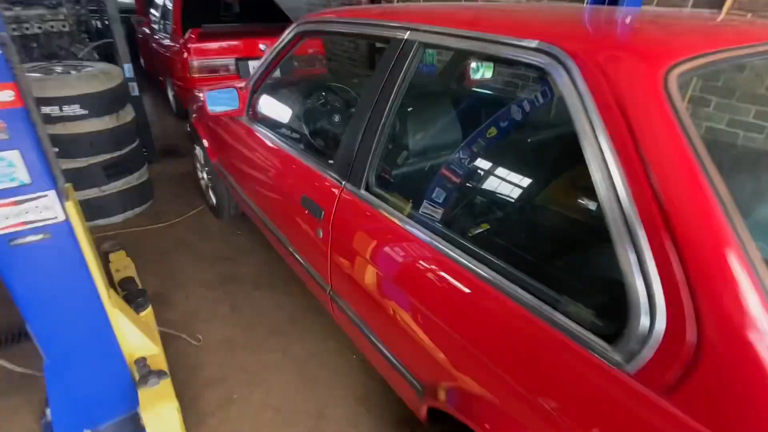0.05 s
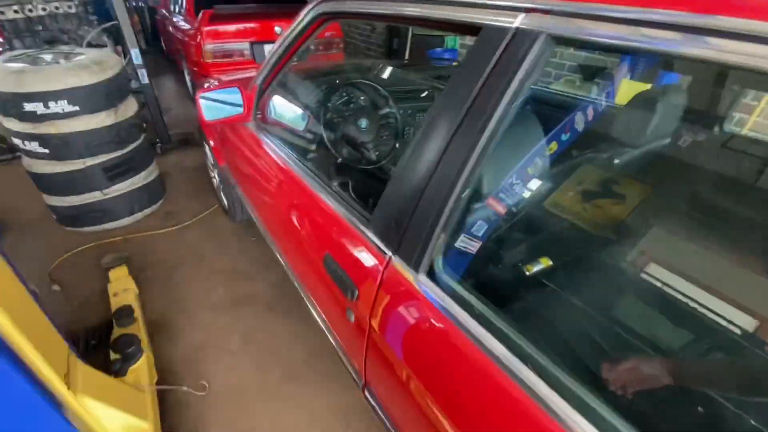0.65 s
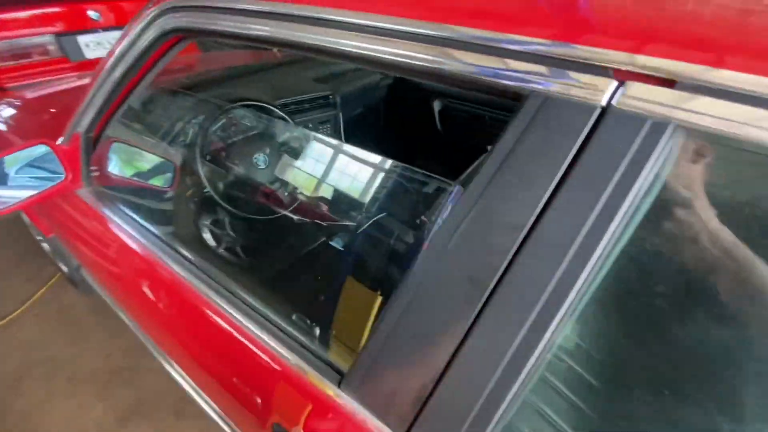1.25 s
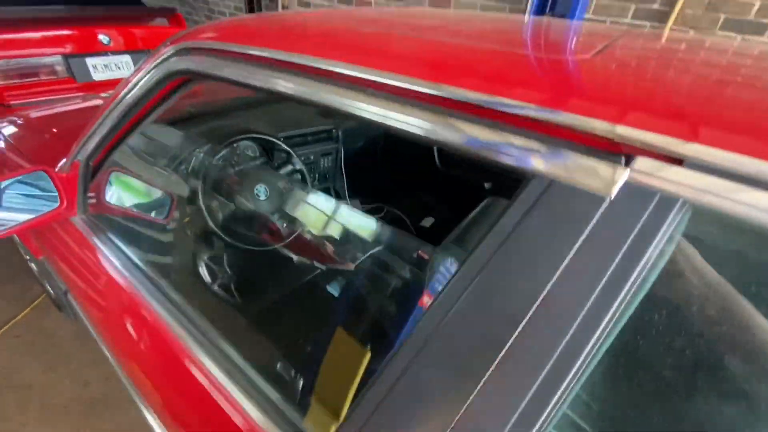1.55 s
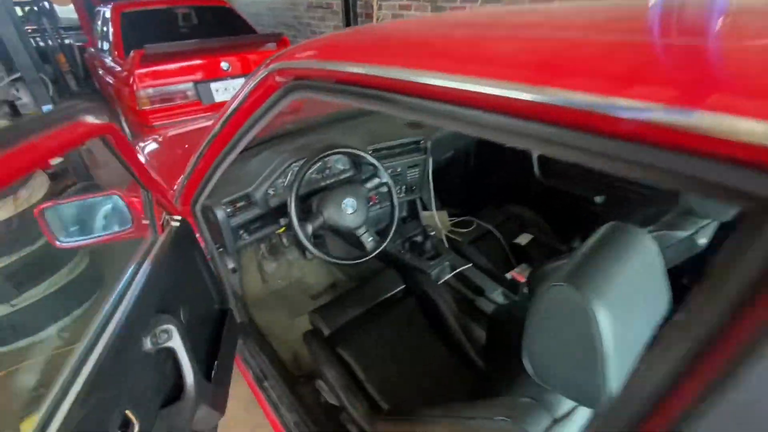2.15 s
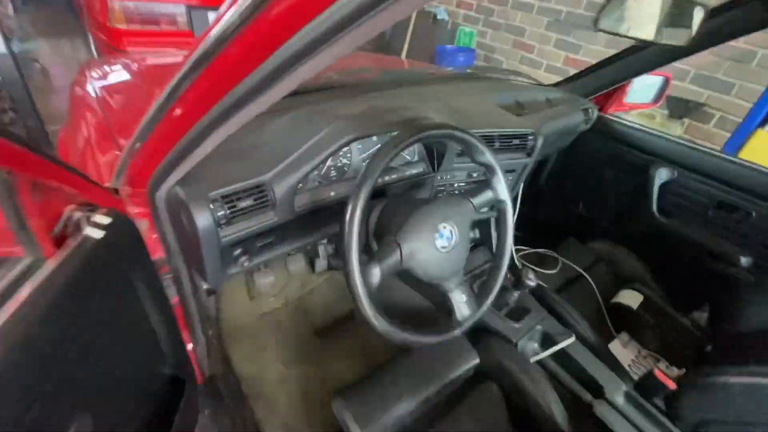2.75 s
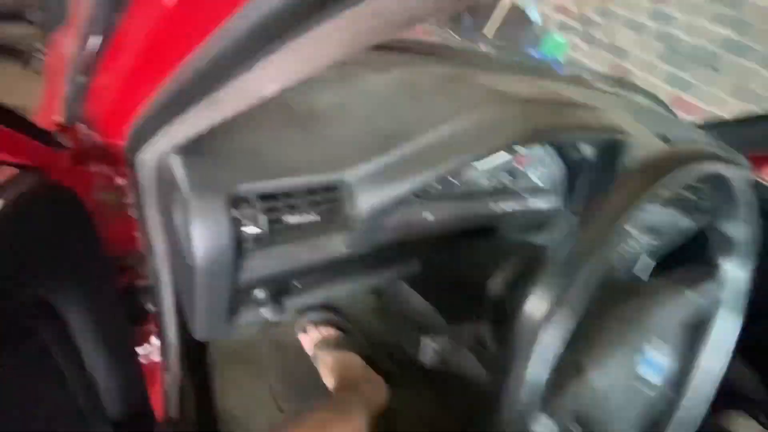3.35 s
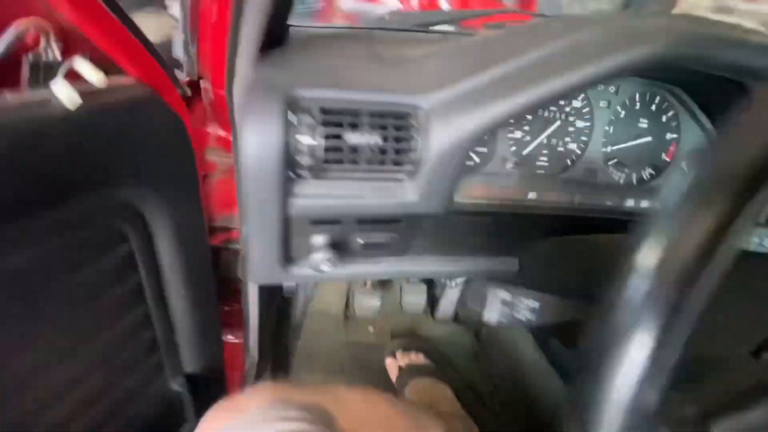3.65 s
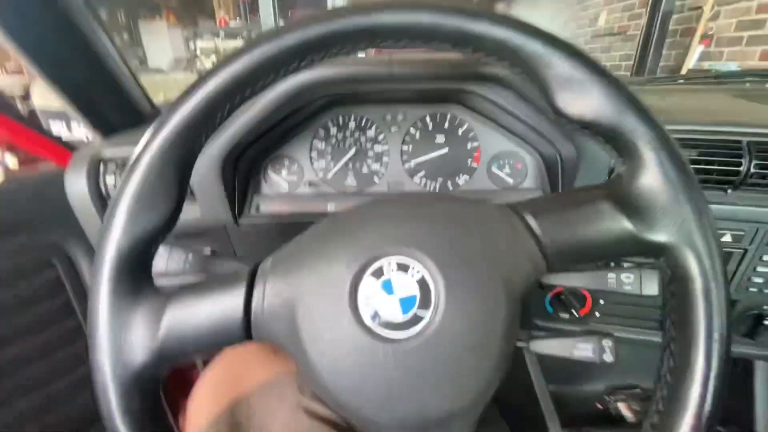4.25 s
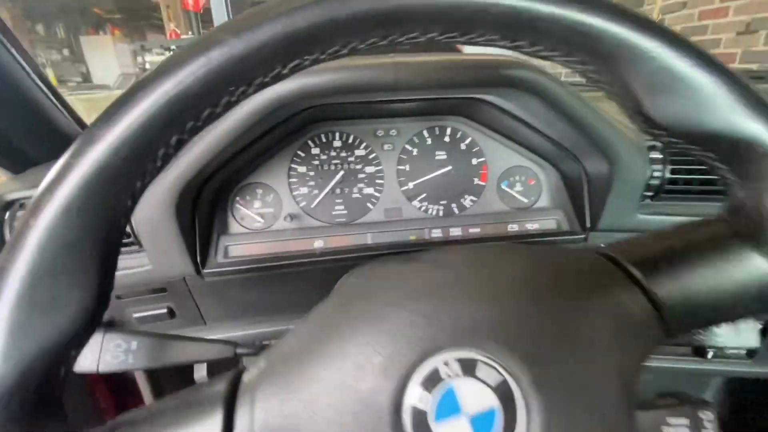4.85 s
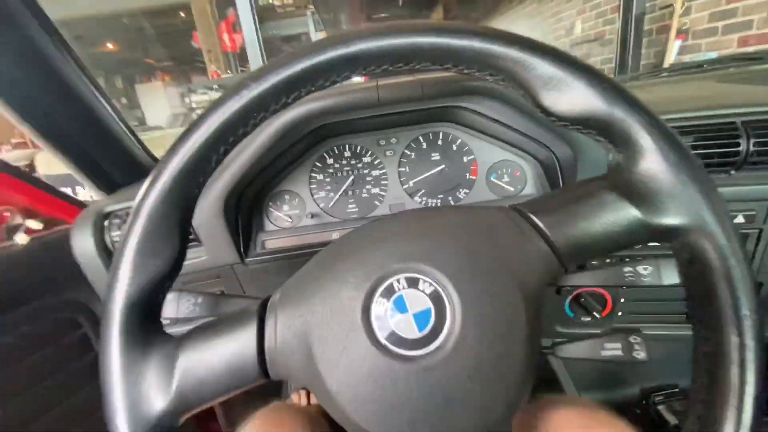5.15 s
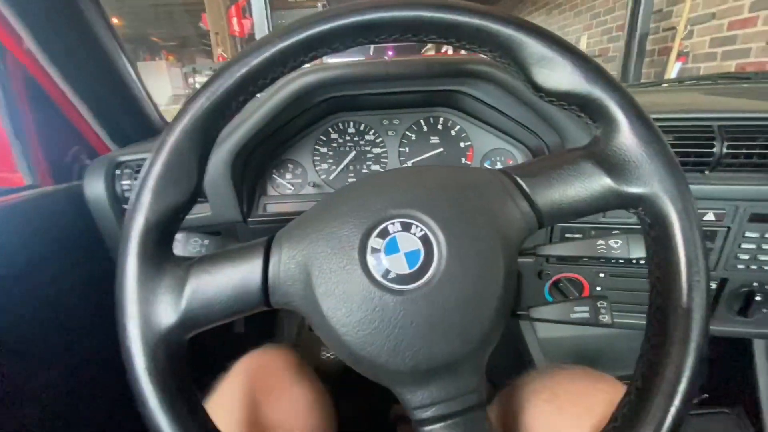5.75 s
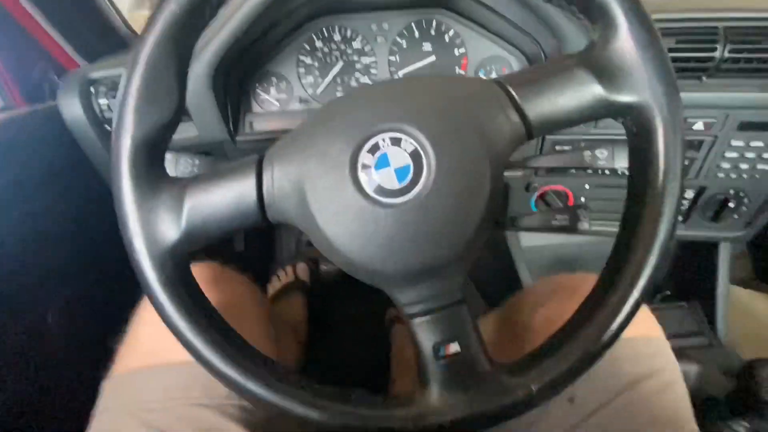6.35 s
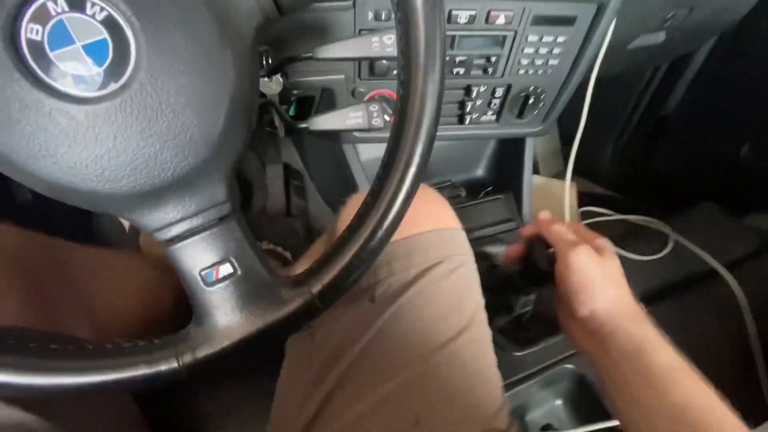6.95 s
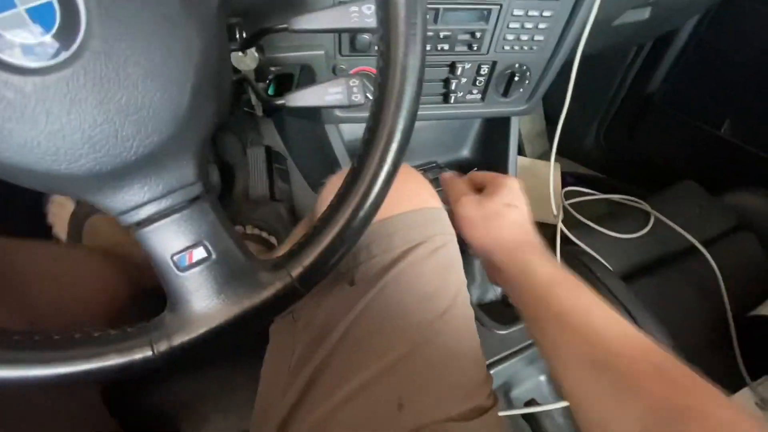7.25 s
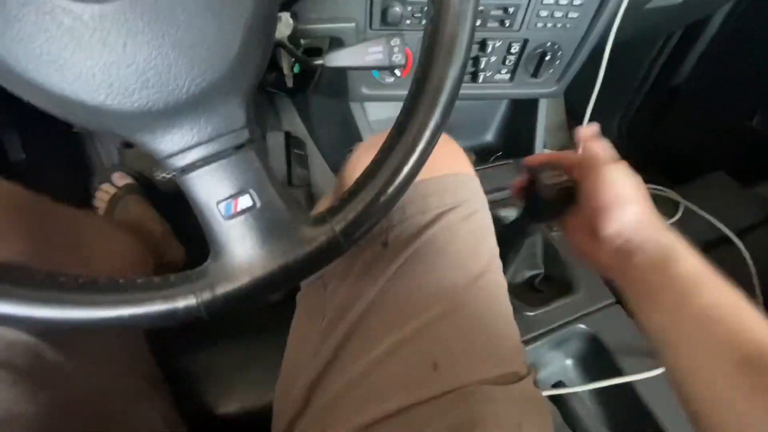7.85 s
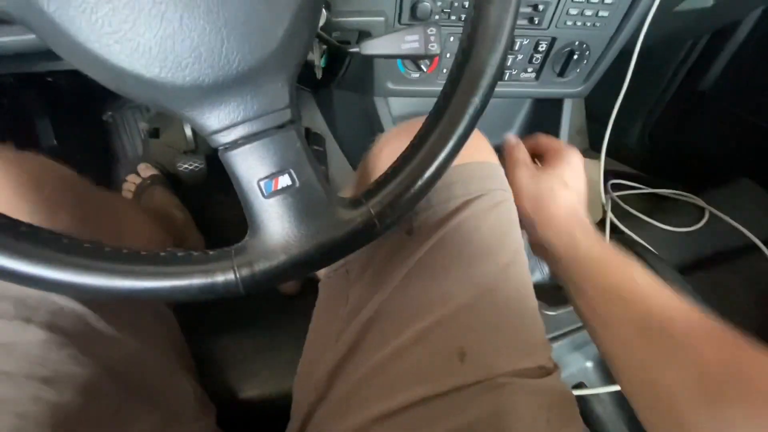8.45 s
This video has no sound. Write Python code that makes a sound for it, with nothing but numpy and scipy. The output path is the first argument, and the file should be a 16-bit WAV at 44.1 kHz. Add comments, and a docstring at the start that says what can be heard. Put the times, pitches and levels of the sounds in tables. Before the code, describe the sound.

Latch clacks, rustling and bumps as someone climbs into a car, a booming door slam, then dull gear lever knocks with no engine running.

```python
"""In a workshop, someone unlatches a car door, swings it open, slides onto the seat and slams it shut.
Then, in the closed cabin with the engine off, the gear lever is knocked through its gates.
Each impact excites dense panel vibration; heavy ones also ring the normal modes of door skin, latch,
frame, linkage, floor or cabin air. Stick-slip friction makes clothes rustle and leather and trim creak.
Under it all lies the hum of the workshop, muffled once the door is shut."""
import sys
import numpy as np
from scipy import signal
from scipy.fft import rfft, irfft, next_fast_len
from scipy.io import wavfile

SR = 44100
rng = np.random.default_rng(int(sys.argv[2]) if len(sys.argv) > 2 else 0)


def inscribe(sig):
    """Save sig as 16-bit PCM at rate SR to the path in sys.argv[1].

    A 1-D sig is mono; a 2-D sig holds one channel per row.
    Samples are clipped to [-1, 1] before scaling.
    """
    pcm = np.round(np.clip(np.atleast_2d(sig).T, -1, 1) * 32767)
    wavfile.write(sys.argv[1], SR, pcm.astype(np.int16))


N = 379701
TIME = np.arange(N) / SR
RING_TIME = np.arange(SR * 2 // 5) / SR
BAND_HZ = 32 * 2 ** (np.arange(19) / 2)
LN_1000 = np.log(1000)  # a decay of 60 dB; t60 is the time it takes
BOOM_S = 5.6135  # the door seals the cabin

# Levels in the tables are relative: gains and filters follow. Pan is left minus right.
# The sound field at two points. Each row: frequency in Hz, left-right correlation or pan in dB.
CORRELATION = [(40, 0.83), (200, 0.64), (500, 0.16), (1000, -0.1), (2200, -0.07), (4500, -0.14),
               (9000, 0.48)]
BAND_PAN = [(50, -3.5), (200, 0), (500, -2), (1000, 4.5), (2000, -1.5), (4200, 5.5), (9000, 0.5)]
# Spectra of the sources. Each row: frequency in Hz, band level in dB.
WORKSHOP_SPECTRUM = [(30, -92.5), (46, -75), (70, -62), (160, -67.5), (400, -67.5), (800, -71), (2000, -69),
                     (4000, -73.5), (7000, -87.5), (11000, -83.5), (16000, -112)]
HARDWARE_SPECTRUM = [(45, -20.5), (110, -6), (220, -1), (480, 0), (800, -3.5), (1400, -6), (3200, -8),
                     (5000, 10), (8000, 0), (11000, 23), (13500, -4.5), (16000, -23)]
CLOTH_SPECTRUM = [(30, -9), (60, -1.5), (130, -5.5), (250, -13.5), (600, -5), (850, -7), (1800, -5),
                  (3300, -14.5), (5000, -9), (8000, -15), (11000, -0.5), (13500, -9.5), (16000, -25)]
TRIM_SPECTRUM = [(45, -17), (110, 7), (220, 1.5), (450, -2.5), (800, -5), (1400, -6.5), (3000, -13.5),
                 (5000, 2), (8000, -16.5), (11000, 6.5), (13500, -20), (16000, -4.5)]
SHELL_SPECTRUM = [(45, -3.5), (110, -11), (220, -6), (500, -1.5), (780, -16.5), (1050, -5), (1800, -15),
                  (3200, -7.5), (5000, 2), (8000, -10), (11000, 2.5), (13500, -13), (16000, -23)]
LINKAGE_SPECTRUM = [(45, 13), (110, -9.5), (250, -7.5), (380, -3.5), (750, -7.5), (1600, -3), (3000, -19.5),
                    (5000, -5), (8000, -12.5), (11000, 0), (13500, -17), (16000, -11)]
# Transmission through the closed door. Each row: frequency in Hz, gain in dB.
DOOR_TRANSMISSION = [(60, -5), (400, -16.5), (2000, -13), (5000, -26)]

# Light impacts. Each row: start in seconds, clack level in dB, body level in dB, pan in dB.
OUTSIDE_TICKS = [(0.0568, -41, -42.5, -1), (0.3482, -30, -45.5, 5), (0.3658, -34, -52, -4),
                 (0.641, -42, -42.5, 2.5), (0.8759, -46, -73.5, 2.5), (0.9535, -45.5, -51.5, 2),
                 (0.97, -40, -45.5, 1), (1.082, -48, -68.5, -1.5), (1.118, -45, -69.5, -0.5),
                 (1.134, -37.5, -65.5, 0.5), (1.1548, -40.5, -74, -0.5), (1.1707, -35, -72, 1.5),
                 (2.368, -42.5, -52, -3), (2.5975, -47, -61, 10), (2.6513, -44, -57, 5)]  # ticks, scuffs and steps
LIMB_BUMPS = [(2.729, -55, -42, -1), (3.2142, -36.5, -30, -2), (3.3767, -48, -34.5, 1.5),
              (3.6295, -33, -32.5, 3.5), (4.0102, -44, -37.5, -4), (4.0427, -39.5, -33.5, -1),
              (4.1864, -27.5, -27, 0.5), (4.2042, -39, -28.5, -1.5), (4.283, -37, -37, 2),
              (4.4516, -47, -26, 0), (4.471, -35.5, -36.5, 2), (4.6861, -38.5, -28, -1),
              (4.925, -38.5, -51, 1.5), (5.2364, -47, -42, 0), (5.468, -55, -38, 0.5),
              (6.3856, -41, -42.5, 3), (6.4547, -47, -50.5, 2)]
LEVER_KNOCKS = [(6.7594, -50, -60, 4.1), (6.92, -67.5, -51, 1.9), (7.198, -51.5, -45.5, 1.4),
                (7.21, -47, -43, 2.2), (7.3472, -47, -38.5, 2.2), (7.405, -51.5, -56, 8),
                (7.635, -51.5, -49, 0.88), (7.8353, -50.5, -46, 3.3), (7.8844, -56.5, -55, 6),
                (8.303, -43.5, -50, 4.1), (8.464, -52, -39.5, 2.8), (8.4945, -37, -32.5, 6)]  # play in the gear linkage
# Hard impacts. Each row: start in seconds, levels of clack, body and bright edge in dB, t60 in seconds.
LATCH_IMPACTS = [(1.318, -37.5, -39, -81, 0.15), (1.3442, -30, -44, -57.5, 0.058),
                 (1.4094, -15.5, -16, -31.5, 0.062), (1.5153, -24, -36.5, -53, 0.056),
                 (1.661, -46, -45.5, -67, 0.12), (1.7535, -30, -39.5, -45, 0.11),
                 (1.8175, -25.5, -22, -70, 0.15)]
SLAM_IMPACTS = [(5.5653, -11.5, -22, -28, 0.24), (5.579, -9, -5.5, -43, 0.15),
                (5.597, -41, -17, -31.5, 0.24), (5.617, -12, 0, -27.5, 0.044),
                (5.665, -22.5, -18, -42, 0.11), (5.713, -24.5, -26, -41, 0.092),
                (5.759, -29, -30, -60, 0.091), (5.832, -40, -35, -70, 0.16), (5.9, -38, -41, -82, 0.08)]  # first catch, second catch, seal, frame, then the loose window

# Rubs with their own resonances. Each row: middle in seconds, level in dB, half-length in seconds,
# frequency in Hz, bandwidth in Hz.
CREAKS = [(0.059, -48, .003, 620, 600), (0.644, -39, 0.0027, 950, 700), (1.397, -32, 0.0082, 620, 220),
          (1.5205, -32.5, 0.0022, 3360, 1400), (1.521, -38, 0.0032, 1640, 500),
          (1.533, -28.5, 0.006, 433, 140), (1.758, -34, 0.0032, 3570, 500), (1.759, -33, 0.004, 707, 250),
          (1.822, -30, .0015, 800, 600), (1.823, -30, 0.0026, 3160, 700), (2.369, -52, 0.0045, 2800, 1210),
          (2.429, -54, .012, 1300, 400), (2.56, -55, .004, 2010, 900), (2.616, -47.5, 0.0076, 1350, 250),
          (2.637, -49.5, .005, 2550, 916), (2.655, -43, 0.0022, 3330, 1100),
          (2.656, -45, 0.0031, 1350, 600), (2.958, -41, 0.013, 1330, 350), (2.975, -48, .003, 2600, 1500),
          (3.025, -44.5, 0.0055, 3800, 2180), (3.525, -48.5, 0.0051, 2200, 2180),
          (3.632, -36.5, 0.0019, 2150, 800), (3.65, -46, 0.0029, 2200, 1494),
          (3.819, -47, 0.019, 2740, 450), (3.866, -43, 0.013, 2100, 893), (4.016, -35, 0.0057, 1320, 800),
          (4.048, -43, 0.0023, 2300, 900), (4.286, -40.5, .0014, 1980, 1800),
          (4.359, -49, 0.041, 1150, 350), (4.529, -49, 0.0021, 1600, 900), (4.574, -46, .002, 1400, 700),
          (4.607, -42, .0025, 1310, 592), (4.641, -44, 0.0033, 1490, 900), (4.788, -42, .016, 1240, 400),
          (4.915, -46, 0.0026, 1700, 900), (5.024, -45.5, 0.0018, 2300, 1600),
          (5.24, -46.5, .0015, 2000, 1500), (5.474, -47, 0.0022, 2400, 1500),
          (6.448, -49.5, .012, 960, 297)]  # handle, door stay, soles, seat leather and trim
STRIKER_CRUNCHES = [(5.567, -15.5, .0016, 1200, 802), (5.569, -19.5, 0.00076, 3610, 3510),
                    (5.577, -20.5, 0.00092, 4200, 1500), (5.58, -18.5, .001, 1700, 695),
                    (5.5895, -19, 0.0014, 3500, 702), (5.576, -26, 0.0082, 1607, 712),
                    (5.5858, -12.5, 0.0027, 1150, 603), (5.591, -21, .003, 3200, 904),
                    (5.597, -21, 0.002, 3000, 2476), (5.605, -18, 0.0014, 1495, 1809),
                    (5.622, -14.5, 0.0036, 1080, 400), (5.627, -25, 0.0068, 2050, 249),
                    (5.634, -23, .0012, 2900, 1200), (5.673, -29.5, 0.0052, 1860, 352),
                    (5.715, -31, 0.0018, 2200, 1800), (5.76, -37, 0.0022, 2400, 3000)]  # the latch rides over the striker and the pane chatters
PIVOT_SQUEAKS = [(7.238, -50.5, .02, 1486, 45), (7.68, -60.5, 0.061, 1620, 80), (7.862, -63, .04, 1625, 80),
                 (8.04, -75, 0.084, 1504, 700), (8.286, -63.5, 0.021, 1494, 1096),
                 (6.765, -58.5, 0.0029, 5000, 1200), (8.305, -55, .0015, 5000, 908),
                 (8.306, -52, .002, 1430, 250), (8.468, -44, .004, 1460, 300),
                 (8.49, -37.5, .002, 1700, 1300), (8.496, -31, 0.0034, 1450, 500),
                 (8.497, -28.5, 0.0071, 540, 224), (8.505, -27.5, 0.0052, 1070, 450)]
# Rubs, one resonance to a table. Each row: middle in seconds, level in dB, half-length in seconds.
CLOTH_SWISHES = [(0.97, -57.5, 0.024), (1.16, -48.5, 0.069), (2.6, -55, 0.036), (2.98, -46, 0.076),
                 (3.79, -43, 0.056), (5.563, -37, 0.0064)]
SPRING_GROANS = [(1.325, -33, 0.005), (1.392, -31, .0035), (1.481, -31, 0.008), (1.58, -51, 0.01),
                 (1.71, -42, 0.008)]
SEAT_CREAKS = [(4.37, -54, 0.048), (4.66, -47, 0.034), (4.84, -43, 0.082), (4.965, -42, 0.0053),
               (5.06, -44, 0.018), (5.1, -41, 0.01), (5.205, -44, 0.013), (5.243, -35, 0.004),
               (5.474, -40, 0.003), (6.03, -49, 0.017)]
SEAT_SQUEAKS = [(4.87, -45.5, 0.071)]
LEVER_BOOT_RUBS = [(6.62, -56.5, 0.077), (7.01, -64.5, 0.038), (7.13, -57.5, 0.033), (7.28, -59.5, 0.024),
                   (7.415, -60, .012), (7.465, -59, .01), (8.53, -43, 0.044)]
# The person reaches, climbs in, settles and works the lever. Each row: time of full strength, swell,
# hold and fade in seconds, levels of cloth, rumble and hiss in dB.
MOVEMENTS = [(1.31, 0.3, 0.18, 0.068, -54, -55.5, -67), (2.38, 0.028, 0.064, 0.19, -54, -59.5, -65),
             (2.76, 0.073, 0.015, 0.016, -61.5, -56.5, -80), (2.968, 0.26, 0.031, 0.12, -50.5, -63, -55),
             (3.207, 0.027, 0.49, 0.28, -57.5, -52.5, -63.5), (3.67, 0.088, 0.22, 0.35, -43.5, -42.5, -57),
             (4.46, 0.1, 0.27, 0.09, -50, -45, -66), (4.793, 0.11, 0.15, 0.35, -48, -48, -63),
             (5.216, 0.16, 0.13, 0.04, -57.5, -59.5, -66.5), (5.771, 0.079, 0.023, 0.13, -48, -27.5, -54.5),
             (6.042, 0.24, 0.34, 0.22, -57.5, -47.5, -66), (6.787, 0.084, 0.018, 0.062, -59, -55, -75),
             (7.145, 0.17, 0.65, 0.11, -66, -52, -83.5), (7.95, 0.026, 0.033, 0.15, -76.5, -70, -85.5),
             (8.54, 0.11, 0.026, 0.11, -49.5, -33.5, -72)]

# Soft blows through the car's body. Each row: start in seconds, level in dB, pitch in Hz,
# ring of the cabin air in dB relative to the blow.
FLOOR_THUMPS = [(1.388, -28, 150, -12), (1.419, -28, 56.6, -21), (1.438, -34, 137, -7),
                (1.457, -31, 205, -10), (1.888, -22, 196, -11.5), (2.757, -42.5, 73, -8),
                (3.232, -28.5, 125, -1), (3.326, -29, 124, -5), (3.648, -24.5, 127, -1.5),
                (4.22, -32, 62, 9), (4.456, -27, 151, 1), (4.688, -22.5, 123, -1.5),
                (5.797, -15.5, 41.5, -6), (5.95, -31, 45, -4), (7.03, -42.5, 76, -12),
                (7.236, -40, 87, -14)]
# Blows that excite modes. Each row: start in seconds, level in dB, low-pass corner in Hz.
LATCH_BLOWS = [(1.411, -38.5, 9000), (1.519, -38, 4040)]  # the latch springs open, then snaps back
SKIN_BLOWS = [(1.416, -24, 900), (1.519, -45, 900), (1.836, -23, 302)]
FRAME_BLOWS = [(5.5665, -24.5, 5930), (5.581, -14, 4006), (5.599, -17, 601), (5.617, -24, 2000),
               (5.668, -39, 3020)]  # the door lands in its frame and rattles
# Normal modes. Each row: frequency in Hz, level in dB, t60 in seconds.
LATCH_MODES = [(1180, -11, .25), (1284, -4.5, 0.42), (1520, -5.5, .14), (2100, -11, 0.25), (2414, -7.5, .2),
               (3600, -7.5, .16), (4430, -9.5, .16), (4795, -15.5, .42)]
SKIN_MODES = [(184, -3.5, 0.3), (202, -13, 0.68), (252.3, -3.5, 0.3), (328, -11.5, 0.2), (373, -3, .14),
              (421, -5.5, 0.22), (460, -1.5, 0.14), (524, -1.5, 0.27), (539, -4.5, 0.18), (602, -2.5, 0.16),
              (660, -9.5, .1)]
FRAME_MODES = [(328.5, -5, 0.21), (495, -9.5, 0.2), (535, -6.5, .26), (624.5, -2, .2), (691, -12, 0.089),
               (758, -11, 0.069), (943, -6.5, 0.16), (1035, -9, 0.24), (1086, -9, 0.21), (1200, -11, 0.34),
               (1294, -13, 0.16), (1470, -11.5, 0.15), (1630, -10.5, 0.22), (1757, -16, 0.19),
               (1984, -13, 0.44), (2170, -16.5, 0.39), (2370, -14.5, .22), (2660, -18.5, .2),
               (2780, -12.5, .22), (2980, -17, .24), (3220, -15.5, 0.13), (3330, -17, 0.16),
               (4000, -21.5, .3)]
CABIN_AIR_MODES = [(31.47, -19.5, 0.99), (41.65, -18.5, 1), (63.84, -3.5, 0.32), (79.56, -16, 1),
                   (121, -12.5, 0.27), (157, -22, 0.4), (204.5, -22, 0.85)]
LINKAGE_MODES = [(339, 6.5, 0.15), (386, 0.5, 0.072), (538, 2.5, 0.065), (1460, -19, 0.19),
                 (1640, -34, 0.13), (2120, -7, 0.14)]
# Panels flexing under hard blows. Each row: start in seconds, peak in dB, first and last pitch in Hz,
# glide and swell in seconds.
PANEL_FLEXES = [(1.8286, -14, 626, 189, 0.0083, 0.0062), (3.2135, -32.5, 855, 139, .012, 0.0098),
                (4.187, -29, 754, 180, 0.012, 0.0081), (6.3865, -35, 735, 423, 0.0051, 0.0025),
                (7.209, -37.5, 425, 326, 0.0069, 0.0027), (7.348, -28, 564, 129, 0.0076, 0.011)]
# Resonances of the thin hiss after the slam. Each row: frequency in Hz, bandwidth in Hz, level in dB.
HISS_BANDS = [(4700, 900, -66), (6560, 1100, -63.5), (8300, 610, -62), (9000, 1000, -71)]
# Gear changes. Each row: start in seconds, clack and thump levels in dB, thump pitch in Hz, delays of
# thump and seating in seconds, body of the seating clack in dB relative to the thump.
GEAR_CHANGES = [(6.7835, -54.5, -27.5, 81.2, 0.024, 0.024, -36), (7.5256, -46, -23, 82.2, 0.013, 0.04, -17),
                (7.714, -47, -23.5, 83.6, 0.013, 0.037, -17.5), (8.339, -41, -20, 81.5, 0.014, 0.045, -16),
                (8.487, -41, -26, 55.8, 0.013, 0.017, -12)]

# Reflections from glass, dashboard and roof. Each row: delay in seconds, gain.
REFLECTIONS = [(.0031, 0.0062), (.0067, -0.087), (0.0116, .35), (0.017, -0.051)]
# Peaks and dips of the microphone port. Each row: frequency in Hz, bandwidth in Hz, gain in dB.
PORT_RIPPLE = [(3760, 250, -1), (4740, 320, 2), (5400, 410, -5.5), (5750, 220, 3.5), (6150, 300, -5.5),
               (6500, 450, 3.5), (7600, 330, -7), (8200, 410, 2)]


def amp(db):
    """Amplitude grows tenfold for every 20 dB."""
    return 10 ** (np.asarray(db) / 20)


def curve(points, hz=BAND_HZ):
    """Interpolation of (Hz, value) points on a logarithmic frequency axis."""
    known_hz, values = np.transpose(points)
    return np.interp(np.log(hz), np.log(known_hz), values)


def add(out, start_s, sound):
    """Superposition: a sound adds to those already present."""
    start = int(start_s * SR)
    part = sound[..., :N - start]
    out[:, start:start + part.shape[-1]] += part


def resonance(x, hz, width_hz):
    """A damped oscillator driven by x, with unit gain at its centre."""
    return signal.lfilter(*signal.iirpeak(hz, hz / width_hz, fs=SR), x + 1e-18)


def wander(per_s):
    """Random modulation: straight lines between Gaussian values."""
    return np.interp(TIME * per_s, np.arange(4096), rng.standard_normal(4096))


def noise_bands(size):
    """Partly coherent noise at two points, in half-octave bands: bands x 2 x size."""
    length = next_fast_len(size, True)
    hz = np.maximum(np.fft.rfftfreq(length, 1 / SR), 1)
    mid, side = rfft(rng.standard_normal((2, length)))
    correlation = np.clip(curve(CORRELATION, hz), -1, 1)
    sign = np.array([[1], [-1]])
    pair = mid * np.sqrt((1 + correlation) / 2) + sign * side * np.sqrt((1 - correlation) / 2)
    pair *= amp(sign * curve(BAND_PAN, hz) / 2)
    octaves_off = abs(np.log2(hz) - np.log2(BAND_HZ)[:, None])
    windows = np.sqrt(np.maximum(1 - 2 * octaves_off, 0))
    spectra = (pair * window / np.sqrt(np.mean(window ** 2)) for window in windows)
    return np.array([irfft(band.astype(np.complex64), length)[:, :size] for band in spectra])


def impacts(rows, spectrum, noise, hollow_db, lag_s, low_ring, crack, crack_s):
    """Dense modes ring as noise; dispersive bending waves bring the lows later and keep them longer."""
    out = np.zeros((2, N))
    slowness = np.sqrt(1000 / BAND_HZ)[:, None]  # relative to a bending wave at 1 kHz
    age = np.maximum(RING_TIME - lag_s * slowness, 0)
    rise = 1 - np.exp(-age / (0.0018 + 1.6 / BAND_HZ[:, None]))
    overshoot = 1 + crack * np.exp(-age / (crack_s * slowness))
    for s, clack_db, body_db, edge_db, t60, pan_db in rows:
        middle_db = (body_db + clack_db) / 2 + hollow_db
        blow_db = curve([(400, body_db), (750, middle_db), (1400, clack_db),
                         (3000, clack_db), (5000, edge_db)])
        decay = np.exp(np.maximum(-LN_1000 * age / (t60 * slowness ** low_ring), -20))
        envelope = amp(curve(spectrum) + blow_db)[:, None] * rise * overshoot * decay
        bands = noise[:, :, int(s * SR):][:, :, :len(RING_TIME)]
        burst = np.einsum("bcn,bn->cn", bands, envelope[:, :bands.shape[-1]])
        add(out, s, amp([[pan_db / 2], [-pan_db / 2]]) * burst)
    return out


def light(rows, edge_db, t60):
    """Light impacts on one material share its damping, and their bright edge follows the clack."""
    return [(s, clack, body, clack + edge_db, t60, pan) for s, clack, body, pan in rows]


def ring(modes, rise_s, soft_hz, spread_hz):
    """Free decay of normal modes; shorter waves differ more in phase between left and right."""
    t, out = TIME[:SR * 3 // 2], 0
    for k, (hz, db, t60) in enumerate(modes):
        phase = (-1) ** k * min(hz / spread_hz, 1) * np.array([[1], [-1]])
        gain = amp(db) / np.hypot(1, (hz / soft_hz) ** 2)
        out = out + gain * np.exp(-LN_1000 * t / t60) * np.sin(2 * np.pi * hz * t + phase)
    return out * (1 - np.exp(-t / rise_s))


def struck(blows, modes, rise_s, spread_hz):
    """A linear body rings in the same modes at every blow; softer blows excite fewer of them."""
    out = np.zeros((2, N))
    for s, db, soft_hz in blows:
        add(out, s, amp(db) * ring(modes, rise_s, soft_hz, spread_hz))
    return out


def workshop_hum(noise):
    """Background noise, whose treble suffers most from the transmission loss of the shut door."""
    open_db = curve(WORKSHOP_SPECTRUM)
    spectra = amp([open_db, open_db + curve(DOOR_TRANSMISSION)]).astype(np.float32)
    clear, muffled = np.tensordot(spectra, noise, 1)[..., ::-1]  # reversed: unrelated to the impacts
    shut = np.interp(TIME, [BOOM_S, BOOM_S + 0.1], [0, 1])
    # a faint narrow hum, heard only at a distance from the car
    tone = resonance(resonance(rng.standard_normal((2, N)), 440, 50), 440, 90)
    tone *= amp(np.interp(TIME, [0.2, 0.8, 1.6], [-61, -63, -95])) / tone.std()
    return (clear * (1 - shut) + muffled * shut) * amp(0.42 * wander(4)) + tone


def stick_slip(rows, hz, width_hz):
    """Stick-slip friction: irregular impulses swell and fade, driving a resonance of the rubbed body."""
    out = np.zeros((2, N))
    for s, db, half_s in rows:
        u = np.linspace(-2, 2, int(4 * half_s * SR))
        # a few slips are much harder than the rest
        force = amp(1.6 * np.minimum(rng.exponential(size=SR // 64 + 1), 3)).repeat(64)[:SR]
        near, far = rng.standard_normal((2, SR)) * (rng.random(SR) < 0.06) * force
        slips = np.array([near, 0.39 * near + far])[:, :len(u)]
        rub = resonance(resonance(slips, hz, width_hz), hz, 2 * width_hz)
        add(out, s - 2 * half_s, amp(db) * rub / rub.std() * np.exp(-u ** 2)[:SR])
    return out


def friction():
    """Friction drives clothes, latch, seat leather, lever pivot and boot, each at its own resonance."""
    creaks = sum(stick_slip([(s, db, half_s)], hz, width_hz)
                 for s, db, half_s, hz, width_hz in CREAKS + STRIKER_CRUNCHES + PIVOT_SQUEAKS)
    boot_scrapes = [(s + thump_s, -62, 0.034) for s, _, _, _, thump_s, *_ in GEAR_CHANGES]
    return (creaks + stick_slip(CLOTH_SWISHES, hz=2900, width_hz=2300)
            + stick_slip(SPRING_GROANS, hz=500, width_hz=84)
            + stick_slip(SEAT_CREAKS, hz=546, width_hz=143)
            + stick_slip(SEAT_SQUEAKS, hz=1790, width_hz=150)
            + stick_slip(LEVER_BOOT_RUBS, hz=1350, width_hz=1000)
            + stick_slip(boot_scrapes, hz=1638, width_hz=840))


def outside_ticks(noise):
    """Steps and scuffs beside the car: brief contacts have broad spectra."""
    return amp(-6.5) * impacts(light(OUTSIDE_TICKS, edge_db=-26.5, t60=0.1), HARDWARE_SPECTRUM, noise,
                               hollow_db=-1.5, lag_s=0.00072, low_ring=0.13, crack=0.35, crack_s=0.00088)


def seam_snags(per_s=130):
    """Seams catch and release at random, a Poisson train of tiny clicks."""
    snags = (rng.random(N) < per_s / SR) * amp(3.5 * np.minimum(rng.exponential(size=N), 3))
    return amp(15.5) * resonance(snags * rng.standard_normal((2, N)), hz=2200, width_hz=1500)


def rustle(noise, grain_db=1.5, flicker_db=2.5):
    """Clothes rub and shifting weight rumbles through the car; incoherent movements add in power."""
    power = np.zeros((3, N))
    for s, swell_s, hold_s, fade_s, *levels_db in MOVEMENTS:
        early, late = np.maximum(s - TIME, 0), np.maximum(TIME - s - hold_s, 0)
        effort = np.exp(-np.minimum((early / swell_s) ** 2 + late / fade_s, 20))
        power += (amp(levels_db)[:, None] * effort) ** 2
    cloth, rumble, hiss = np.sqrt(power)
    grain = amp(grain_db * wander(350))
    # broad and fine folds slip at different moments, so low, middle and high rustle flicker apart
    folds = [cloth * grain * amp(flicker_db * wander(45)) for _ in range(3)]
    register = curve([(250, 0), (550, 1), (1500, 2), (3500, 3), (7500, 4)])
    out = cloth * seam_snags()
    for k, envelope in enumerate([rumble, *folds, hiss * grain]):
        gains = amp(curve(CLOTH_SPECTRUM)) * np.maximum(1 - abs(register - k), 0)
        out += envelope * np.tensordot(gains.astype(np.float32), noise, 1)
    return out


def door_opening(noise, pan_db=-0.6):
    """Handle, latch and door stay clack; impulses excite the normal modes of latch and door skin."""
    clacks = impacts([(*row, pan_db) for row in LATCH_IMPACTS], HARDWARE_SPECTRUM, noise,
                     hollow_db=-1.5, lag_s=0.00094, low_ring=0.56, crack=0.16, crack_s=0.0019)
    latch = struck(LATCH_BLOWS, LATCH_MODES, rise_s=0.001, spread_hz=6300)
    skin = struck(SKIN_BLOWS, SKIN_MODES, rise_s=0.004, spread_hz=2600)
    return amp(-3) * clacks + latch + skin


def thumps(rows, droop, cabin_hz, cabin_t60, rise_cycles=1.59):
    """Structure-borne sound: a padded blow swells, sags in pitch and leaves the cabin air ringing."""
    out, t = np.zeros((2, N)), RING_TIME
    for s, db, hz, cabin_db in rows:
        peak_s = rise_cycles / hz
        u = t / peak_s
        cycles = hz * (t + droop * peak_s * (1 - np.exp(-u)))
        blow = (u * np.exp(1 - u)) ** 2 * np.sin(2 * np.pi * cycles)
        air_envelope = (1 - np.exp(-u / 2)) * np.exp(-LN_1000 * t / cabin_t60)
        air = air_envelope * np.sin(2 * np.pi * cabin_hz * t)
        add(out, s, amp(db) * (blow + amp(cabin_db) * air))
    return out


def panel_flexes():
    """Dispersion: high bending waves arrive first, so each knock falls to the panel's lowest note."""
    out = np.zeros((2, N))
    for s, db, first_hz, last_hz, glide_s, swell_s in PANEL_FLEXES:
        hz = last_hz + (first_hz - last_hz) * np.exp(-(RING_TIME / glide_s) ** 2)
        u = RING_TIME / swell_s
        add(out, s, amp(db) * u * np.exp(1 - u) * np.sin(2 * np.pi * np.cumsum(hz) / SR))
    return out


def limb_bumps(noise):
    """Feet, knees and elbows strike sill, seat and trim, where damping soon ends the vibration."""
    return amp(-1.5) * impacts(light(LIMB_BUMPS, edge_db=-15, t60=0.079), TRIM_SPECTRUM, noise,
                               hollow_db=-2.5, lag_s=0.00099, low_ring=0.061, crack=0.16, crack_s=0.0022)


def door_slam(noise, pan_db=1.5):
    """A train of impacts excites the body shell and the normal modes of the door in its frame."""
    shell = impacts([(*row, pan_db) for row in SLAM_IMPACTS], SHELL_SPECTRUM, noise,
                    hollow_db=3, lag_s=0.00072, low_ring=0.068, crack=0.37, crack_s=0.0031)
    return amp(-6) * shell + struck(FRAME_BLOWS, FRAME_MODES, rise_s=0.002, spread_hz=2100)


def cabin_boom(shudder_t60=0.52):
    """Cavity resonance: the closing door compresses the trapped air, and many panels shudder on."""
    t = TIME[:SR]
    panels = noise_bands(SR)[(BAND_HZ >= 80) & (BAND_HZ < 200)].mean(axis=0)
    shudder = panels * np.exp(-LN_1000 * t / shudder_t60) * (1 - np.exp(-t / 0.016))
    out = np.zeros((2, N))
    add(out, BOOM_S, amp(0.5) * ring(CABIN_AIR_MODES, rise_s=0.0024, soft_hz=400, spread_hz=780))
    add(out, BOOM_S, amp(-23) * shudder)
    return out * amp([[-2], [1]])


def slide_hiss(start_s=5.78, rise_s=0.19, hold_s=0.42, fade_s=0.15):
    """Noise filtered by high resonances gives a wavering hiss, as of a hand sliding over trim."""
    effort = np.interp(TIME, np.cumsum([start_s, rise_s, hold_s, fade_s]), [0, 1, 1, 0])
    rub, out = rng.standard_normal((2, N)), 0
    for hz, width_hz, db in HISS_BANDS:
        band = resonance(resonance(rub, hz, width_hz), hz, 2 * width_hz)
        out = out + amp(db) * band / band.std()
    return effort * amp(0.71 * wander(30)) * out


def gear_lever(noise, pan_db=2.5, soft_hz=2500):
    """Impacts across the play in the linkage excite the modes of its rods."""
    knocks = list(LEVER_KNOCKS)
    for s, clack_db, thump_db, _, _, seat_s, seat_db in GEAR_CHANGES:
        knocks.append((s, clack_db, thump_db - 17, pan_db))  # into the gate
        knocks.append((s + seat_s, clack_db - 4.5, thump_db + seat_db, pan_db))  # the gear seats
    clacks = impacts(light(knocks, edge_db=-17.5, t60=0.17), LINKAGE_SPECTRUM, noise,
                     hollow_db=-5.5, lag_s=0.00016, low_ring=0.018, crack=0.47, crack_s=0.0032)
    rod_blows = [(s, body_db - 5, soft_hz) for s, _, body_db, _ in knocks]
    return amp(-5.5) * clacks + struck(rod_blows, LINKAGE_MODES, rise_s=0.0042, spread_hz=2800)


def gearbox_thumps():
    """Each change thumps the gearbox, which couples through the structure to the cabin air."""
    blows = [(s + delay_s, db, hz, -4) for s, _, db, hz, delay_s, *_ in GEAR_CHANGES]
    return thumps(blows, droop=0.026, cabin_hz=72.2, cabin_t60=0.48)


def reverberation(dry, t60, damping, wet_db):
    """A diffuse field decays exponentially, sooner in the treble; it holds little bass."""
    t = TIME[:SR]
    band_t60 = t60 / (1 + damping * BAND_HZ / 10000)
    weight = np.sqrt(BAND_HZ / np.sum(BAND_HZ)) * BAND_HZ / (BAND_HZ + 200)
    envelope = weight[:, None] * np.exp(-LN_1000 * t / band_t60[:, None]) * (1 - np.exp(-t / 0.0026))
    tail = np.einsum("bcn,bn->cn", noise_bands(SR), envelope)
    tail /= np.sqrt(np.sum(tail ** 2) / 2)
    return dry + amp(wet_db) * signal.fftconvolve(dry, tail, axes=1)[:, :N]


def cabin_reflections(dry):
    """Comb filtering: echoes from nearby hard surfaces interfere with the direct sound above the bass."""
    upper = signal.sosfilt(signal.butter(2, 500, "high", fs=SR, output="sos"), dry + 1e-18)
    out = dry.copy()
    for delay_s, gain in REFLECTIONS:
        add(out, delay_s, gain * upper)
    return out


def scene():
    """Three paths superpose: the echoing workshop, the small padded cabin and the car's structure."""
    noise = noise_bands(N)
    outside = reverberation(outside_ticks(noise) + door_opening(noise),
                            t60=0.75, damping=0.65, wet_db=-8.5)
    knocks = panel_flexes() + limb_bumps(noise) + door_slam(noise) + gear_lever(noise)
    knocks = reverberation(knocks, t60=0.66, damping=0.1, wet_db=-18)
    clothes = amp(-2.5) * rustle(np.roll(noise, SR, axis=2))
    rubs = amp(-1.5) * (friction() + slide_hiss())
    inside = cabin_reflections(knocks + clothes + rubs)
    floor = amp([[-1], [1]]) * thumps(FLOOR_THUMPS, droop=0.074, cabin_hz=109.1, cabin_t60=0.27)
    return outside + inside + floor + gearbox_thumps() + cabin_boom() + workshop_hum(noise)


def record(dry, top_hz=15800):
    """Microphone port resonances notch and ripple the treble; saturation and a low-pass follow."""
    port = signal.sosfilt(signal.butter(3, [12300, 15600], "bandstop", fs=SR, output="sos"), dry)
    for hz, width_hz, db in PORT_RIPPLE:
        port = port + (amp(db) - 1) * resonance(port, hz, width_hz)
    rounded = port / (1 + port ** 4) ** (1 / 4)  # softens the slam's peaks
    return signal.sosfilt(signal.ellip(8, 0.2, 70, top_hz, fs=SR, output="sos"), rounded)


dry = scene()
out = record(dry)
inscribe(out)
```